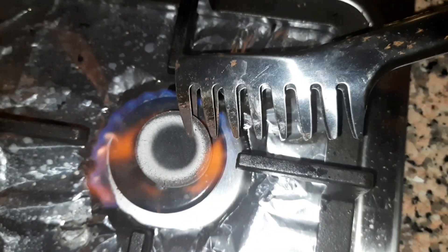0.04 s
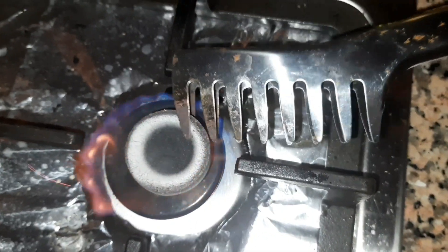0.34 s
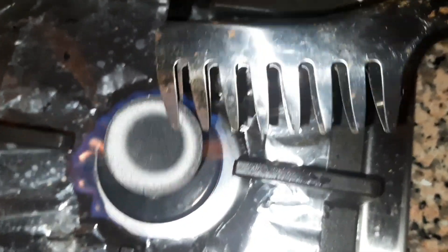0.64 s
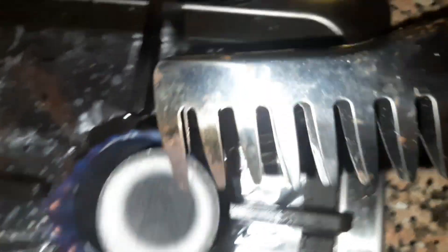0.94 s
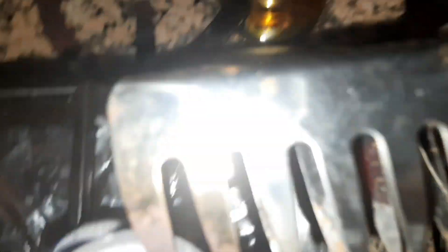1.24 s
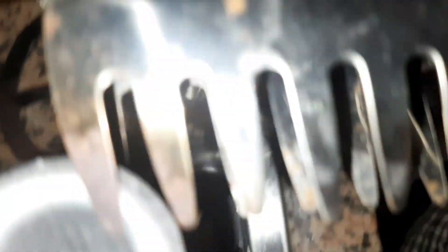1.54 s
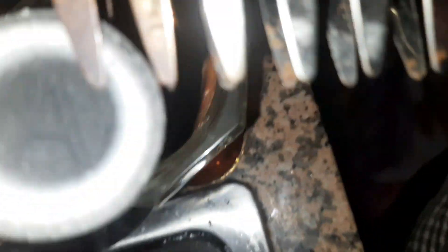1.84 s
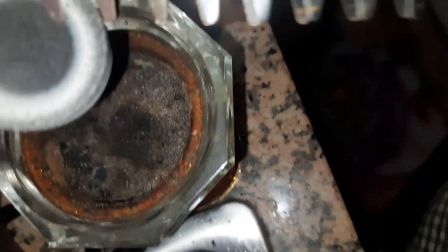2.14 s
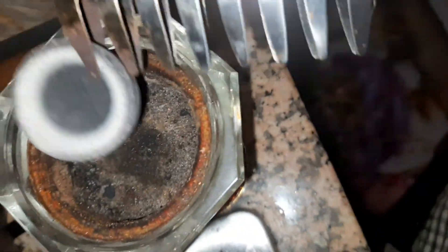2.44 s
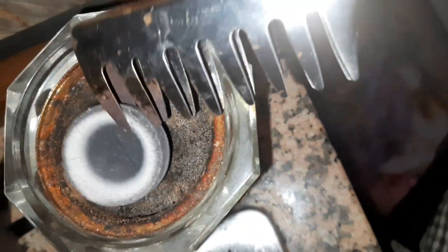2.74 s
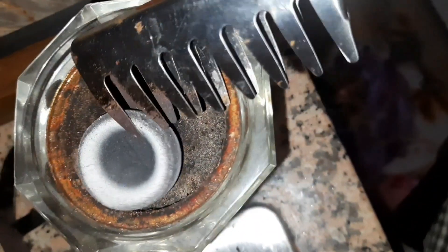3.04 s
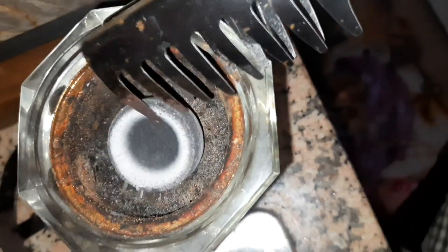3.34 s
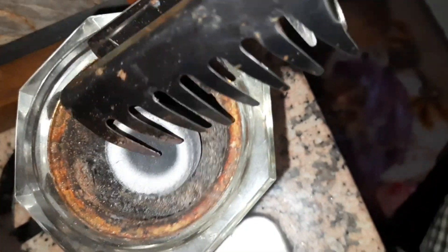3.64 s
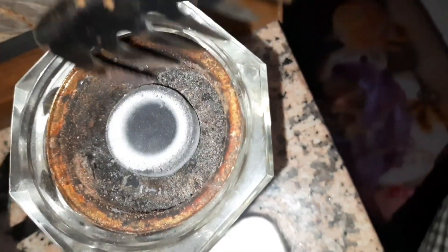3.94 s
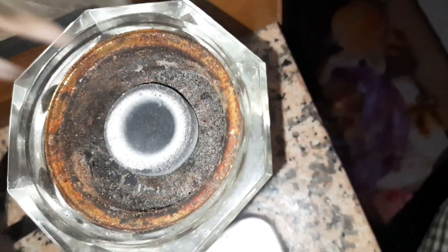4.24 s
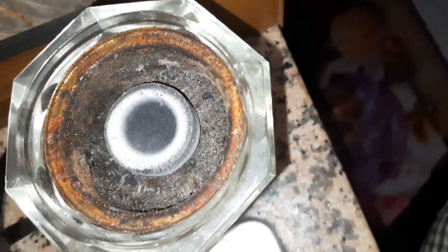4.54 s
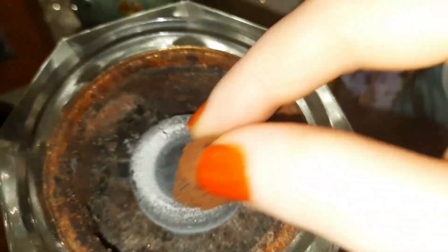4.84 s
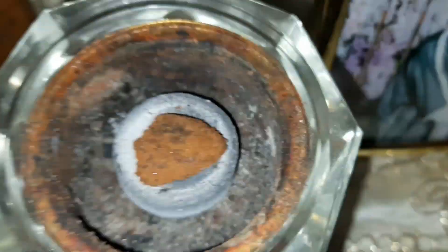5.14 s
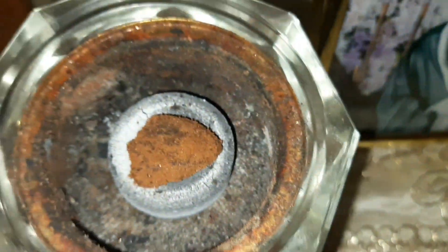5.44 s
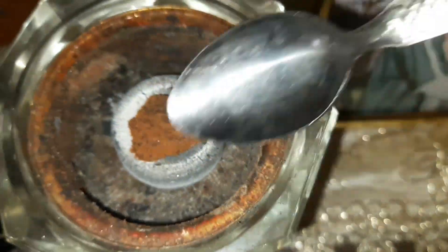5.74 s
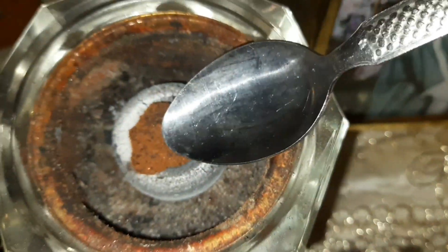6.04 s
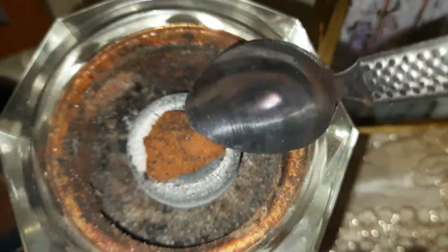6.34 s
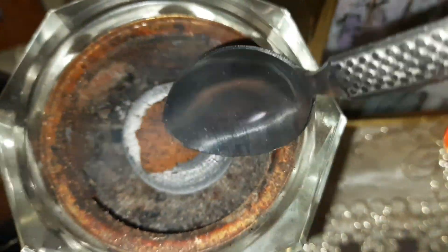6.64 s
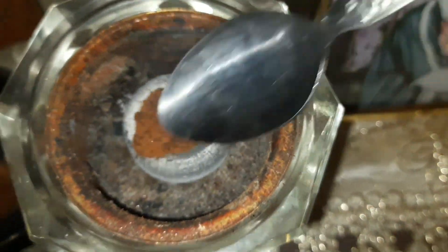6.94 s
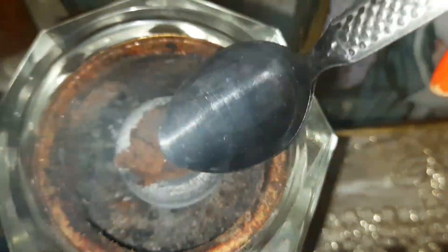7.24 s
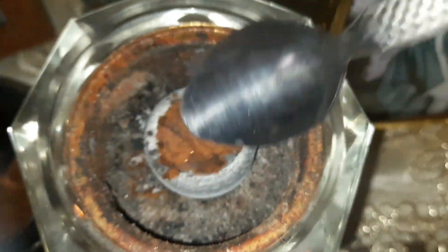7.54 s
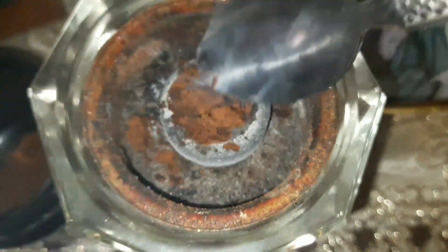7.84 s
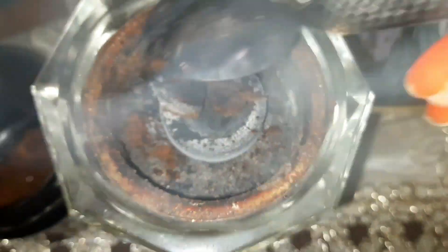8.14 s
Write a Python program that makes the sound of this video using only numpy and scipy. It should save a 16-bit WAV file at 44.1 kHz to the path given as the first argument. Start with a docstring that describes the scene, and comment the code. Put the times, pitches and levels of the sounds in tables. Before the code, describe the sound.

A gas flame roars under fizzing charcoal as steel tongs clatter and scrape against glass, then a spoon softly pats crumbling incense.

```python
"""A gas flame roars under a fizzing charcoal disc; the stove hums and booms once.
Steel tongs clink, clatter on the pan support and scrape the disc into a glass burner; steel and glass ring.
The scene cuts to a quiet kitchen: incense ticks on the hot disc and a spoon pats and crumbles it.
Dull knocks carry through the counter. All is heard from close by."""
import sys
import numpy as np
from scipy import signal
from scipy.fft import rfft, irfft
from scipy.io import wavfile

SR = 44100
rng = np.random.default_rng(int(sys.argv[2]) if len(sys.argv) > 2 else 0)


def dump(signal):
    """Clip the signal to [-1, 1] and save it as 16-bit WAV at the path in sys.argv[1]."""
    limited = np.clip(np.atleast_2d(signal).T, -1, 1)
    pcm = np.round(limited * 32767).astype(np.int16)
    wavfile.write(sys.argv[1], SR, pcm)


N = 365148

# Spectral outlines. Each row: frequency in Hz, relative level in dB.
ROOM_EQ = [(25, -18), (70, 7), (200, -3), (380, -8.5), (480, -16), (630, -9), (1000, -29), (1450, -18),
           (1750, -24.5), (2150, -19.5), (3300, -32.5), (8000, -23.5), (11000, -28), (16000, -26.5)]
RUMBLE_EQ = [(25, -21.5), (65, 4.5), (140, 3), (280, -3), (420, -14.5), (800, -31.5), (3000, -63)]
FLAME_EQ = [(25, -26), (55, -4.5), (110, 1), (260, -1.5), (520, -2.5), (1000, -15), (2400, -15),
            (3400, -22), (5000, -20), (16000, -38)]
FIZZ_EQ = [(1500, -21.5), (3500, -28.5), (5000, -1), (8000, 4.5), (10000, -2.5), (12000, 6), (16000, -3)]
CRUMB_EQ = [(200, 2), (1000, -5.5), (4000, -7), (5500, -11.5), (8500, 0.5), (12000, 2.5), (16000, 6)]
PAT_EQ = [(150, -13), (600, -14), (950, 5.5), (1350, 2.5), (1700, -14.5), (2050, 2), (2500, -21.5),
          (3400, -11.5), (6000, -13.5), (16000, -16)]  # spoon on soft incense
GRATE_EQ = [(60, -8), (200, 2.5), (450, -1.5), (800, 1), (1400, 1.5), (2600, 4.5), (3600, -4.5), (5200, -3),
            (7000, -13), (9000, -12), (12500, -8.5), (16000, -16.5)]  # pan support
TONGS_EQ = [(100, -14), (500, -6), (1000, -9.5), (2100, 5), (3000, -1.5), (3900, 0.5), (4800, -10),
            (6500, -1), (8200, 4.5), (10200, -7.5), (11500, 5.5), (12800, -7), (16000, -3.5)]
GLASS_EQ = [(100, 8), (700, 2.5), (1200, 9), (1800, 5.5), (3400, 3), (6000, 4), (8200, 6), (9500, -4),
            (12000, 10), (16000, -3)]
# Modes of pan support, tongs and glass. Each row: frequency in Hz, relative level in dB, t60 in seconds.
GRATE_RING = [(748.2, -11.5, .3), (1107, -4.5, 0.25), (1325, -0.5, .16), (1825, -4.5, .25),
              (1948, 2.5, 0.16), (2360, -7.5, 0.27), (2784, -1.5, 0.17), (3830, 0, 0.19), (4210, -2.5, .17),
              (4870, -8, .2), (4965, 2, 0.161), (5400, -4, 0.067), (6068, 1, 0.14), (6350, -2, 0.13),
              (8266, -6, .18), (9320, -7.5, .17), (10800, -7, 0.18), (12800, -5, .1), (14460, -11, .16)]
TONGS_RING = [(1960, -5, 0.146), (2180, -4, 0.24), (2450, -2, 0.049), (3150, -14, .18), (3850, -7, .11),
              (6400, 1, 0.1), (7300, -8, 0.12), (8350, 0, 0.11), (7920, -1, .11), (7770, -9.5, 0.11),
              (9390, -12, .12), (11330, -3, 0.21), (11400, -5, 0.15), (13440, -0.5, .1), (14890, -6, 0.087)]
GLASS_RING = [(1033, 3, 0.031), (1626, -3.5, 0.14), (5480, -13.5, 0.15), (6730, -7, 0.07),
              (7840, -7, 0.036), (10200, 3, 0.026), (13720, -5, 0.12), (15400, 5, 0.024)]
# Gas burner resonances. Each row: centre in Hz, width in Hz, boost in dB.
BURNER_PEAKS = [(633, 54, 8.5), (1450, 53, 8), (2330, 790, 8)]
# Flame strength. Each row: time in seconds, roar level in dB.
ROAR_LEVELS = [(0, -49), (1.0, -47), (1.7, -46), (2.3, -51), (3.1, -48.5), (4.0, -47), (4.7, -47.5)]
# Knocks through the counter. Each row: start in seconds, level in dB, pitch in Hz, t60 in seconds.
COUNTER_KNOCKS = [(.16, -52, 43.7, 0.77), (0.749, -39, 76.6, 0.23), (1.23, -41.5, 103, .29),
                  (1.826, -25.5, 217, 0.31), (1.85, -34, 120.5, 0.36), (4.743, -39.5, 260.6, 0.079),
                  (4.78, -46.5, 158, 0.19), (4.989, -48.5, 174, 0.079), (6.198, -51, 183, 0.12),
                  (6.67, -50, 267, .11), (6.905, -45, 254, 0.14), (7.101, -44, 208, .12),
                  (7.359, -44, 298, 0.12), (7.54, -44.5, 240, 0.099), (7.645, -25.5, 128, 0.044),
                  (7.796, -40, 167, .09), (7.946, -26, 123, 0.032)]
# Cracking crumbs. Each row: time in seconds, level in dB, treble in dB.
CRUMB_TICKS = [(2.7577, -25, -2), (4.9803, -44, -5), (5.131, -35.5, -1.5), (5.1992, -47.5, -0.5),
               (5.3481, -27, 0), (6.4204, -39.5, -4), (7.0992, -35, -10.5), (7.492, -45, -2),
               (7.6577, -28, -10), (7.79, -45, -2), (7.9839, -49, -0.5)]
# Pats of tongs, fingers, spoon. Each row: time in seconds, level in dB, t60 in seconds, treble in dB.
SOFT_PATS = [(3.712, -26.5, 0.023, -6), (5.301, -54, 0.011, -17), (6.159, -54.5, 0.092, -6.5),
             (6.44, -50, 0.19, -2), (6.49, -49.5, 0.053, -14), (6.911, -49, 0.042, -10),
             (7.102, -53.5, 0.095, 1), (7.196, -53, .054, -3), (7.398, -55, 0.05, 5),
             (7.491, -32, 0.02, -8.5), (7.578, -45, 0.078, -5), (7.649, -50, 0.11, -5),
             (7.669, -35.5, 0.025, -20), (7.794, -46, 0.058, 0), (7.914, -55, .058, 1),
             (7.951, -47.5, .11, -9), (8.185, -60, 0.083, -8)]
# Rubs and squeaks. Each row: centre in seconds, level in dB, half length in seconds, pitch and width in Hz.
SOFT_RUBS = [(.2, -41.5, 0.049, 421, 128), (.76, -44.5, 0.052, 451, 770), (2.165, -57.5, 0.026, 2980, 1090),
             (3.735, -43, 0.029, 1634, 160), (4.02, -54, 0.059, 12700, 7000),
             (4.485, -51.5, .01, 7050, 3500), (4.94, -65.5, 0.015, 5860, 6070),
             (4.99, -61.5, .055, 1120, 700), (5.81, -62.5, 0.06, 1462, 240), (5.84, -63, 0.056, 1728, 2300),
             (5.99, -69, 0.13, 12160, 5000), (6.11, -65, 0.055, 798, 239), (6.29, -76, 0.031, 3890, 1805),
             (6.45, -55, .013, 3470, 1990), (6.62, -67, 0.023, 2540, 3610), (7.36, -65, .04, 2020, 320),
             (7.725, -62.5, .013, 3080, 1384)]
# Tongs bouncing on the pan support. Each row: time in seconds, level in dB, rise in seconds.
GRATE_BLOWS = [(1.826, -19, .0046), (1.838, -29, .002), (1.852, -24, .002), (1.869, -38.5, .001)]
# Jaws of the tongs meeting. Each row: time in seconds, level in dB, treble in dB.
JAW_CLINKS = [(0.969, -31, -9.5), (1.437, -30, -8), (4.274, -25, -2.5)]
# Steel on charcoal and glass. Each row: time in seconds, level in dB, rise and t60 in seconds, treble in dB.
STEEL_SCRAPES = [(.197, -34.5, 0.017, 0.061, -2.5), (.395, -47, 0.0052, 0.068, -24),
                 (1.228, -37, 0.0064, 0.12, -2), (3.03, -44.5, .004, 0.15, -3.5),
                 (3.09, -39, 0.0092, 0.087, -16), (3.258, -46.5, 0.015, 0.59, -3),
                 (3.331, -34.5, 0.0024, 0.071, -1), (3.462, -48.5, 0.014, 0.052, 0.5),
                 (3.625, -37.5, 0.0087, 0.13, -12.5), (3.683, -49.5, .004, 0.32, 6.5),
                 (3.75, -34, 0.018, 0.14, 1), (3.805, -36, 0.0056, 0.057, -6.5),
                 (3.877, -39.5, 0.0025, 0.11, 0), (3.9, -48, .008, 0.081, 8)]

FLAME_END_S, QUIET_START_S = 4.703, 4.736
RIGHT_LAG_SAMPLES = 10
TIME_S = np.arange(N) / SR


def amp(db):
    return 10 ** (np.asarray(db) / 20)


def unit_rms(x):
    return x / np.sqrt(np.mean(x ** 2))


def pan(left_minus_right_db):
    return amp([[left_minus_right_db / 2], [-left_minus_right_db / 2]])


def fade(t, t60_s):
    return np.exp(-np.log(1000) * t / t60_s)


def swell(start_s, attack_s, hold_s, t60_s):
    """Linear rise, hold, exponential decay."""
    t = TIME_S - start_s
    return np.clip(t / attack_s, 0, 1) * fade(np.maximum(t - attack_s - hold_s, 0), t60_s)


def walk(rate_hz):
    """Random drift, spread near 1."""
    knots = rng.standard_normal(2048)
    return 1.2 * np.interp(TIME_S * rate_hz, np.arange(len(knots)), knots)


def grit(spread_db, shared=0.24):
    """Stereo noise of unequal micro-impacts; the shared part arrives later on the right."""
    sizes = amp(spread_db * np.minimum(rng.exponential(size=N // 16 + 1), 4))
    left, other = rng.standard_normal((2, N)) * np.repeat(sizes, 16)[:N]
    right = shared * np.roll(left, RIGHT_LAG_SAMPLES) + np.sqrt(1 - shared ** 2) * other
    return unit_rms(np.array([left, right]))


def lowpass(x, hz, order=2):
    return signal.sosfiltfilt(signal.butter(order, hz, fs=SR, output="sos"), x)


def convolve(x, response):
    return signal.oaconvolve(x, np.atleast_2d(response), axes=1)[:, :N]


def colour(x, outline, peaks=(), size=4096):
    """Unit-power minimum-phase filter. Each peak: centre in Hz, width in Hz, boost in dB."""
    bins_hz = np.fft.rfftfreq(size, 1 / SR) + 1
    outline_hz, outline_db = np.transpose(outline)
    gain_db = np.interp(np.log(bins_hz), np.log(outline_hz), outline_db)
    gain_db += sum(db / (1 + (2 * (bins_hz - hz) / width_hz) ** 2) for hz, width_hz, db in peaks)
    cepstrum = irfft(np.log(unit_rms(amp(gain_db))))
    cepstrum[1:size // 2] *= 2
    cepstrum[size // 2 + 1:] = 0
    return convolve(x, irfft(np.exp(rfft(cepstrum))))


def contacts(rows, grit_db, pan_db, snap_db=19):
    """Each contact: a shower of micro-impacts plus one click, harder for a faster rise."""
    out, noise = np.zeros((2, N)), grit(grit_db)
    dull = lowpass(noise, 3000)
    bright = noise - dull
    for at_s, db, rise_s, t60_s, treble_db in rows:
        span = np.arange(max(int((at_s - .3) * SR), 0), min(int((at_s + .5) * SR), N))
        t = span / SR - at_s
        force = np.exp(np.minimum(t, 0) / rise_s) * fade(np.maximum(t, 0), t60_s)
        out[:, span] += amp(db) * force * (dull[:, span] + amp(treble_db) * bright[:, span])
        snap = amp(db + snap_db) / (1 + rise_s / 0.00023) ** 2
        out[[0, 1], int(at_s * SR) + np.array([0, RIGHT_LAG_SAMPLES])] += snap
    return out * pan(pan_db)


def swishes(rows, glide_oct_per_s=0):
    """Short bell-shaped swells of band noise."""
    out = np.zeros((2, N))
    for at_s, db, half_s, hz, width_hz in rows:
        span = np.arange(max(int((at_s - 3 * half_s) * SR), 0), min(int((at_s + 3 * half_s) * SR), N))
        t = span / SR - at_s
        noise = rng.standard_normal((2, 2, len(t) + 2048))
        flutter = unit_rms(lowpass(noise, width_hz / 2)[..., 1024:-1024])
        phase = 2 * np.pi * np.cumsum(hz * 2 ** (glide_oct_per_s * t)) / SR
        band = flutter[0] * np.sin(phase) + flutter[1] * np.cos(phase)
        out[:, span] += amp(db) * np.exp(-(t / half_s) ** 2) * band
    return out


def ring(force, modes):
    """Force drives decaying modes, random phase per channel."""
    t = np.arange(SR // 2) / SR
    phases = rng.uniform(0, 2 * np.pi, (len(modes), 2, 1))
    response = sum(amp(db) * fade(t, t60_s) * np.sin(2 * np.pi * hz * t + phase)
                   for (hz, db, t60_s), phase in zip(modes, phases))
    return convolve(force, unit_rms(response) / np.sqrt(len(t)))


def reflections(x, t60_s, wet_db):
    """Adds dense echoes from counter and tiles."""
    t = np.arange(SR // 2) / SR
    tail = rng.standard_normal((2, len(t))) * fade(t, t60_s) * (t > .002)
    return x + amp(wet_db) * convolve(x + x[::-1] / 2, unit_rms(tail) / np.sqrt(len(t)))


def shade(x, pan_db, above_hz=6300):
    """The phone body shades the right microphone from top treble."""
    low = lowpass(x, above_hz, order=4)
    return low + (x - low) * pan(pan_db)


def quiet_room():
    """Faint air; hands rumble and rustle, more during spoon work and after each knock."""
    air = colour(grit(0), ROOM_EQ) * amp(-63 + 2.2 * walk(7)) * pan(.5)
    rest = amp(-70)
    work = amp(-51) * swell(start_s=6.61, attack_s=0.83, hold_s=0.13, t60_s=3.7)
    jolts = sum(amp(db - 21) * swell(at_s, knock_t60_s / 2, 0, t60_s=0.48) * np.sqrt(knock_t60_s / 0.17)
                for at_s, db, _, knock_t60_s in COUNTER_KNOCKS)
    motion = np.sqrt(rest ** 2 + work ** 2 + jolts ** 2) * amp(4.4 * np.tanh(walk(28)))
    rumble = colour(grit(0, shared=0.56), RUMBLE_EQ) * pan(1.3)
    rustle = colour(grit(4.1), PAT_EQ, [(3650, 5900, 5.6)]) * amp(-20.5 + 3.1 * walk(20)) * pan(1.7)
    return air + motion * (rumble + rustle)


def stove(hum_hz=108.5, hum_db=-62, boom_hz=277, boom_db=-38):
    """Low wavering hum; one boom swells while its pitch falls to the hum."""
    boom_start_s, attack_s = 3.935, .125
    level = amp(hum_db) + amp(boom_db) * swell(boom_start_s, attack_s, hold_s=0.056, t60_s=1.2)
    pitch_hz = np.interp(TIME_S - boom_start_s, [0, attack_s], [boom_hz, hum_hz], left=hum_hz)
    phase = 2 * np.pi * np.cumsum(pitch_hz * (1 + .03 * walk(30))) / SR
    tone = np.sqrt(2) * np.sin(phase) * amp(2.1 * walk(22)) * pan(2.1)
    flutter = colour(grit(0, shared=.9), RUMBLE_EQ) * amp(-3)
    return level * (tone + flutter)


def counter(rise_s=0.0044):
    """Soft blows swing the counter for a few cycles."""
    out = np.zeros(N)
    for at_s, db, hz, t60_s in COUNTER_KNOCKS:
        start = int(at_s * SR)
        t = np.arange(min(SR // 2, N - start)) / SR
        envelope = amp(db) * (1 - np.exp(-t / rise_s)) * fade(t, t60_s)
        out[start:start + len(t)] += envelope * np.sqrt(2) * np.sin(2 * np.pi * hz * t)
    return out * pan(1.5)


def sizzle(count=190, width_hz=2200):
    """Tiny gas jets leave pores of the hot charcoal, each at its own pitch."""
    jets = [(FLAME_END_S * when, 6 * size, .002 + .005 * length, 5000 + 6500 * pitch, width_hz)
            for when, size, length, pitch in rng.random((count, 4))]
    return amp(-62) * swishes(jets)


def flame(fizz_growth_db_per_s=.5):
    """Turbulent gas roars in the burner; the fizz follows the heat and grows as the disc catches."""
    heat_db = np.interp(TIME_S, *np.transpose(ROAR_LEVELS))
    roar = colour(grit(0), FLAME_EQ, BURNER_PEAKS) * amp(heat_db + walk(12)) * pan(1.2)
    fizz_db = heat_db - 12 + fizz_growth_db_per_s * TIME_S
    fizz = colour(grit(2.7), FIZZ_EQ) * amp(fizz_db + 2.2 * walk(25)) + sizzle()
    return roar + fizz * pan(5)


def incense(tick_rise_s=0.0005, tick_t60_s=0.0084, pat_rise_per_t60=0.044):
    """Crumbs of charcoal and incense crack; tongs, fingers and spoon pat and rub them."""
    tick_rows = [(at_s, db, tick_rise_s, tick_t60_s, treble_db) for at_s, db, treble_db in CRUMB_TICKS]
    pat_rows = [(at_s, db, pat_rise_per_t60 * t60_s, t60_s, treble_db)
                for at_s, db, t60_s, treble_db in SOFT_PATS]
    ticks = colour(contacts(tick_rows, grit_db=-3, pan_db=10.5, snap_db=16.5), CRUMB_EQ)
    pats = colour(contacts(pat_rows, grit_db=4.5, pan_db=8.5, snap_db=5), PAT_EQ)
    rubs = swishes(SOFT_RUBS, glide_oct_per_s=-0.68) * pan(5.6)  # pitch sinks as a rub slows
    return reflections(ticks + pats + rubs, t60_s=0.084, wet_db=-12)


def tongs(blow_t60_s=0.14, clink_rise_s=.0024, clink_t60_s=.165):
    """Steel tongs rattle on the pan support, clink, and scrape the disc into the glass."""
    hardest_db = max(db for _, db, _ in GRATE_BLOWS)
    blow_rows = [(at_s, db, rise_s, blow_t60_s, 3 + 1.7 * (db - hardest_db))  # softer is duller
                 for at_s, db, rise_s in GRATE_BLOWS]
    clink_rows = [(at_s, db, clink_rise_s, clink_t60_s, treble_db) for at_s, db, treble_db in JAW_CLINKS]
    blows = contacts(blow_rows, grit_db=2.5, pan_db=2.5)
    clinks = contacts(clink_rows, grit_db=-0.06, pan_db=3)
    scrapes = contacts(STEEL_SCRAPES, grit_db=1, pan_db=4)
    grate_peaks = [(4100, 370, 2.8), (6110, 250, 9), (8100, 340, 12), (9480, 300, 6)]
    jaw_peaks = [(2120, 230, 2.8), (7220, 82, 4.7)]
    grate = amp(0.77) * colour(blows, GRATE_EQ, grate_peaks) + amp(-9) * ring(blows, GRATE_RING)
    jaws = amp(4) * colour(clinks, TONGS_EQ, jaw_peaks) + amp(-6) * ring(clinks, TONGS_RING)
    glass = amp(-0.24) * colour(scrapes, GLASS_EQ) + amp(-10.5) * ring(scrapes, GLASS_RING)
    return shade(reflections(grate + jaws + glass, t60_s=0.26, wet_db=-8.5), pan_db=4)


def scene(ramp_s=.004):
    """Stove, a moment of silence, quiet kitchen."""
    stove_gate = np.clip((FLAME_END_S - TIME_S) / ramp_s, 0, 1)
    quiet_gate = np.clip((TIME_S - QUIET_START_S) / ramp_s, 0, 1)
    return (stove_gate * (flame() + stove() + tongs())
            + quiet_gate * quiet_room()
            + (stove_gate + quiet_gate) * (incense() + counter()))


def record(dry):
    """Long waves reach both microphones alike; steep top cut."""
    narrow_below_hz, top_hz = 450, 15800
    mid, side = (dry[0] + dry[1]) / 2, (dry[0] - dry[1]) / 2
    side = side - 0.75 * lowpass(side, narrow_below_hz, order=1)
    pair = np.array([mid + side, mid - side]) * pan(0.45)
    return signal.sosfilt(signal.ellip(10, .2, 70, top_hz, fs=SR, output="sos"), pair)


dry = scene()
out = record(dry)
dump(out)
```